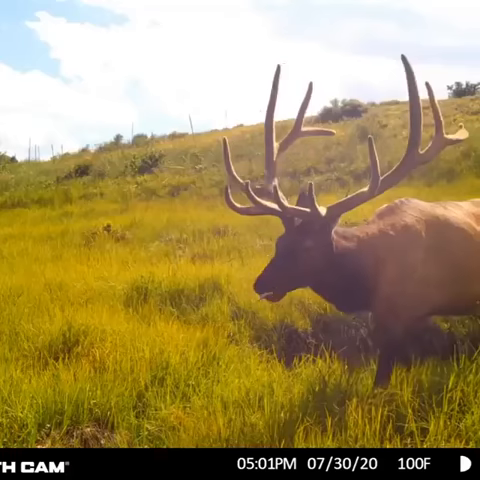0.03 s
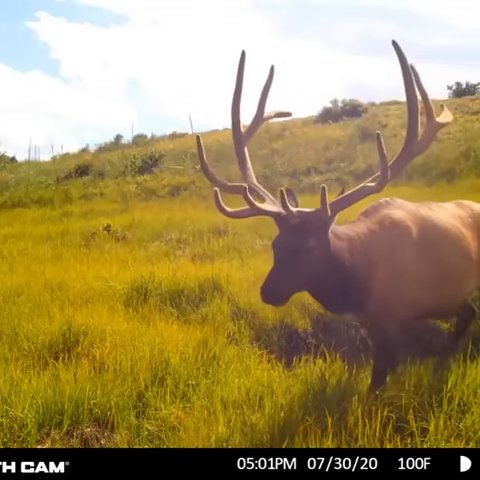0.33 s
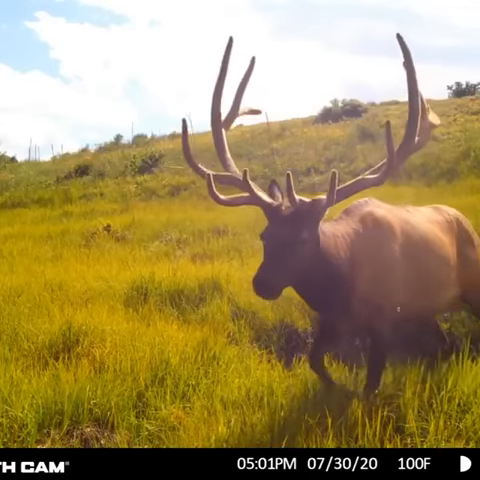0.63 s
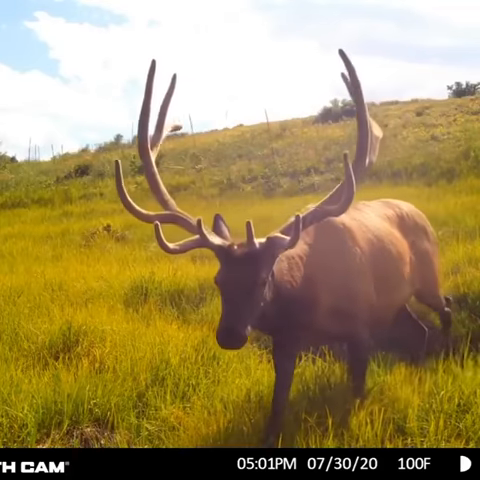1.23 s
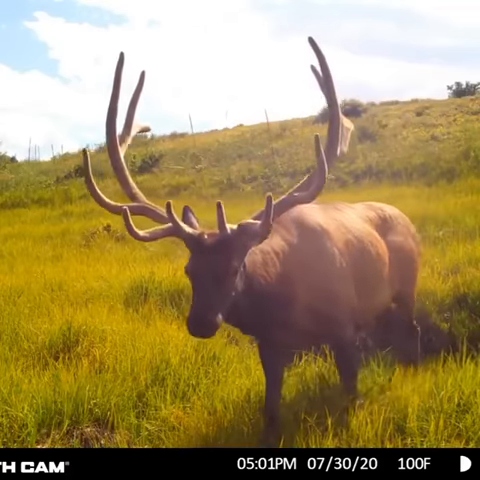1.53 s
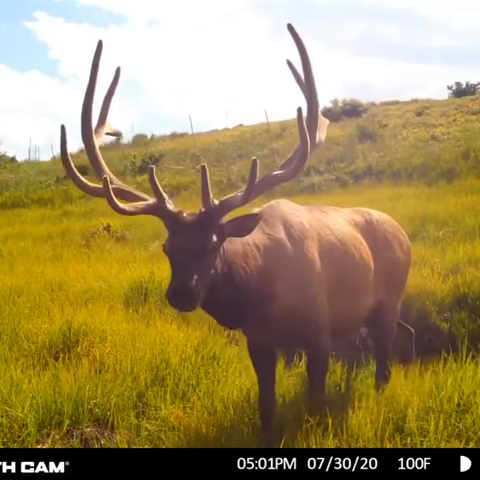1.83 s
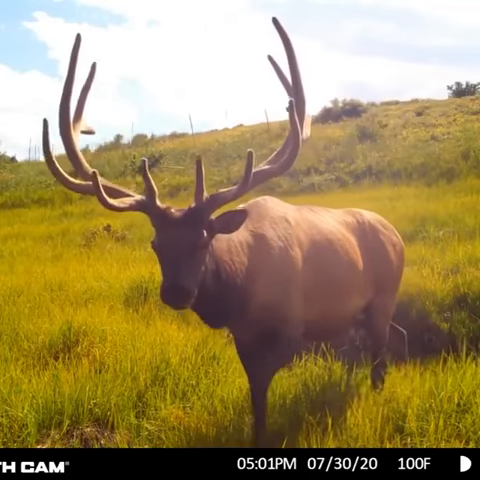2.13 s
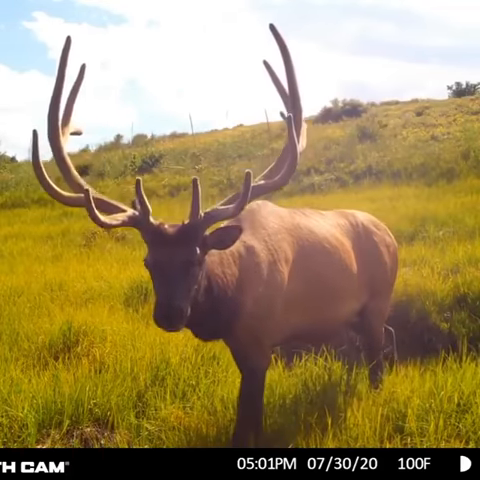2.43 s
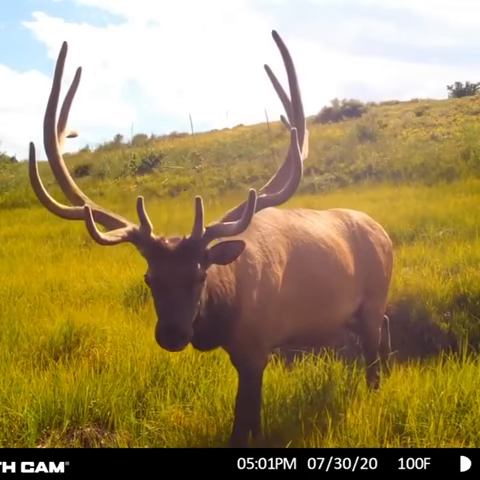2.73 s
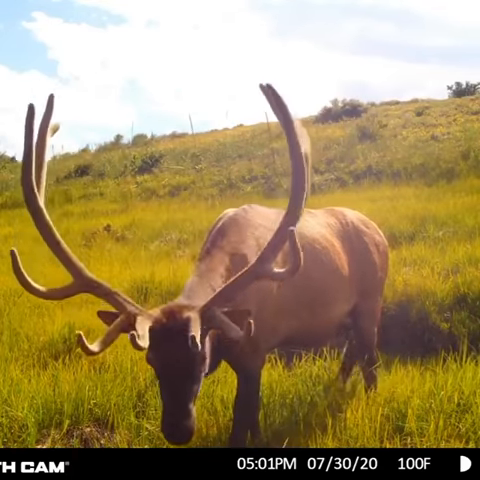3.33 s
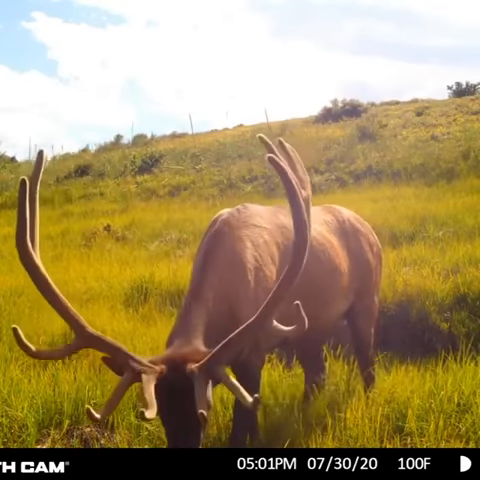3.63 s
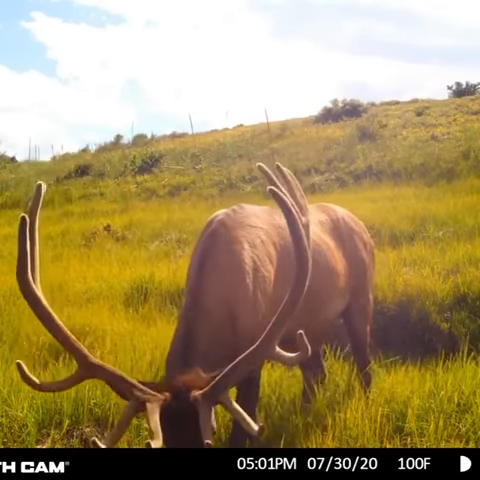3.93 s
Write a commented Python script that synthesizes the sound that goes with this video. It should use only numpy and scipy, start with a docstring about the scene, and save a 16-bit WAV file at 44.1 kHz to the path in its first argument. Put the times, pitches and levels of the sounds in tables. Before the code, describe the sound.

A bird whistles four short calls while grass swishes and wind buffets the microphone.

```python
"""A bird on a grassy hillside repeats a whistle that climbs in three steps and drops at the end.
Each note is one pure, sliding tone that echoes off the slope. An elk walks through the tall grass,
which swishes and ticks against its legs and crunches underfoot, all made of shaped noise.
Wind rumbles and thumps on the microphone over a faint hiss, and a second bird chirps far off."""
import sys
import numpy as np
from scipy import signal
from scipy.fft import rfft, irfft
from scipy.io import wavfile
from scipy.ndimage import uniform_filter1d

SR = 44100
rng = np.random.default_rng(int(sys.argv[2]) if len(sys.argv) > 2 else 0)


def wav_out(sig):
    """Save sig, one row per channel (or a flat mono array), as 16-bit PCM at SR to the path in sys.argv[1]."""
    wavfile.write(sys.argv[1], SR, np.round(np.clip(np.atleast_2d(sig).T, -1, 1) * 32767).astype(np.int16))


N = 176400
TIME = np.arange(N) / SR
START_S, CUTOFF_HZ = .083, 13200

# The bird's calls. Each row: starts in seconds of the three steps, the whistle and the drop,
# a pitch multiplier, then the base levels in dB of those five notes.
CALLS = [(.515, .549, .624, .668, .838, .998, -41.5, -35, -42, -37, -32),
         (1.245, 1.281, 1.323, 1.422, 1.583, .994, -43.5, -35, -42, -33, -35),
         (2.025, 2.059, 2.094, 2.18, 2.377, 1.004, -44, -38, -54, -37.5, -36),
         (2.827, 2.86, 2.886, 2.974, 3.189, 1.006, -44, -40, -43, -35.5, -33)]
# Note shapes. Each row: place in the note from 0 to 1, pitch in Hz, dB added to the base level.
STEP_1_SHAPE = [(0, 2140, 4), (.35, 2260, -13), (.7, 2397, -2.5), (1, 2220, -1)]
STEP_2_SHAPE = [(0, 2930, -13.5), (.3, 2880, -4), (.65, 2925, -8), (1, 3046, -2.5)]
STEP_3_SHAPE = [(0, 3934, -8), (1, 3992, -2)]
WHISTLE_SHAPE = [(0, 4020, -13.5), (.25, 4120, -8.5), (.45, 4190, -4.5), (.7, 4220, -3), (.88, 4212, -5),
                 (1, 4175, -8)]
DROP_SHAPE = [(0, 3193, -6.5), (.3, 2910, -6), (.65, 2936, -15), (1, 2686, -1)]
PIP_SHAPE = [(0, 2260, -12), (1, 2010, -35)]
# Moments when the song's level dips briefly, in seconds.
SONG_DIPS = [.666, 1.372, 1.414, 1.449, 2.252, 2.342, 3.011, 3.102, 3.16]
# Crunches underfoot. Each row: start in seconds, level in dB, pitch in Hz, fade time in seconds.
CRUNCHES = [(0.083, -51, 1160, 0.15), (.57, -49, 1270, 0.028), (1.847, -31.5, 950, 0.003),
            (1.897, -32, 1240, 0.0025), (2.801, -48, 1500, .008)]
# Legs brushing grass, and wind gusts. Each row: middle in seconds, half length in seconds, level in dB.
LEG_SWISHES = [(0.106, 0.028, -49), (0.277, 0.038, -49.5), (0.567, 0.089, -47.5), (0.831, 0.049, -35),
               (0.984, 0.086, -49.5), (1.237, 0.058, -50.5), (1.504, 0.041, -52), (1.642, 0.027, -43.5),
               (1.869, 0.11, -42), (2.281, 0.053, -42.5), (2.414, 0.032, -44.5), (2.843, 0.07, -56),
               (3.111, 0.081, -50.5), (3.306, 0.054, -46), (3.495, 0.058, -39.5), (3.647, 0.069, -45.5),
               (3.94, 0.05, -54)]
WIND_GUSTS = [(0.276, 0.11, -33.5), (1.391, 0.097, -35.5), (1.796, 0.055, -32.5), (2.454, 0.28, -34),
              (3.01, 0.1, -32)]
# Tone of the grass, wind, rough air in a thump, and hiss. Each row: frequency in Hz, strength in dB.
GRASS_TONE = [(300, -8), (3100, -7.5), (3800, -0.5), (4700, 4), (5840, -3), (6330, 0.5), (9330, 4),
              (13000, -4.5)]
RUMBLE_TONE = [(20, -5), (42, 5.5), (65, 2), (95, -6.5), (130, -10.5), (250, -41.5)]
BUFFET_TONE = [(80, -1.5), (185, 3), (280, -10.5), (450, -23), (1500, -68)]
HISS_TONE = [(100, 10), (700, 3.5), (3100, -6.5), (6000, -25), (9000, -30), (13000, -43)]
# Stereo width. Each row: frequency in Hz, gain in dB of the part that sets left and right apart.
STEREO_WIDTH = [(3000, -92), (4500, -6.5), (6500, -4), (12500, -3.5)]
# Wind thumps on the microphone. Each row: middle in seconds, level in dB, pitch in Hz.
WIND_THUMPS = [(0.156, -28.5, 75.2), (0.203, -32.5, 137.5), (0.234, -29.5, 117.1), (0.319, -25, 69.1),
               (0.487, -33, 72.4), (0.751, -21, 54.33), (1.419, -23, 48), (1.738, -27.5, 73.4),
               (2.109, -22.5, 62.4), (2.183, -25.5, 80), (2.23, -20, 78), (2.288, -25, 145.2),
               (2.331, -24, 85), (2.443, -22, 58.2), (2.531, -23, 90.8), (2.559, -24.5, 140.4),
               (2.656, -25.5, 81.4), (2.697, -24.5, 115), (2.766, -25.5, 70), (3.2, -29.5, 69.7)]
# Dry stalks ticking. Each row: start in seconds, level in dB.
STALK_TICKS = [(0.235, -41), (.567, -33), (.864, -29), (2.642, -40), (2.777, -45), (2.787, -40),
               (2.805, -37.5), (3.083, -36.5), (3.301, -34), (3.901, -41), (3.96, -42)]
# The far bird's chirps. Each row: start in seconds, length in seconds, starting pitch in Hz.
FAR_CHIRPS = [(0.402, 0.067, 5740), (1.016, 0.081, 5430), (1.206, 0.089, 5270), (2.702, .1, 5520),
              (3.146, 0.11, 5880)]


def from_db(db):
    """Turn decibels into a multiplier."""
    return 10 ** (np.asarray(db) / 20)


def unit_power(x):
    """Scale a sound so its average power is 1."""
    return x / np.sqrt(np.mean(x ** 2) + 1e-20)


def colour(x, tone):
    """Make each frequency louder or softer, following a table."""
    hz, db = np.transpose(tone)
    all_hz = np.arange(N // 2 + 1) * SR / N
    gain = from_db(np.interp(np.log(all_hz + 1), np.log(hz), db))
    return irfft(rfft(x) * gain, N)


def drift(rate_hz):
    """A smooth random wobble, about 1 in size."""
    r = np.exp(-2 * np.pi * rate_hz / SR)
    return unit_power(signal.lfilter([1], [1, -2 * r, r * r], rng.standard_normal(N + SR))[SR:])


def spread(middle, side):
    """Make stereo that is wide only in the treble."""
    return middle + colour(side, STEREO_WIDTH) * np.array([[1], [-1]])


def swell(middle_s, half_s, db):
    """The power of one smooth rise and fall."""
    return from_db(2 * db) / np.cosh(np.clip((TIME - middle_s) / half_s, -30, 30)) ** 2


def note(shape, start, end, db, pitch, fade_s=.009):
    """A pure tone that slides along its shape; pitch multiplies its frequency at every sample."""
    places, hz, shape_db = np.transpose(shape)
    on = (TIME >= start) & (TIME < end)
    t, out = TIME[on], np.zeros(N)
    place = (t - start) / (end - start)
    fade = np.sin(np.pi / 2 * np.clip(np.minimum(t - start, end - t) / fade_s, 0, 1))
    level = from_db(db + np.interp(place, places, shape_db))
    cycles = np.cumsum(np.interp(place, places, hz) * pitch[on]) / SR
    out[on] = np.sqrt(2) * fade * level * np.sin(2 * np.pi * cycles)
    return out


def bird(overlap_s=.0082, gap_s=.006, drop_s=.026, pip_s=.018):
    """Three short steps up, a long arched whistle, a tiny gap, then a quick drop and a last pip."""
    waver = 1 + .0016 * drift(33)
    # An earlier call is just ending as the sound begins.
    out = note(DROP_SHAPE, .089, .089 + drop_s, db=-34.5, pitch=waver)
    out += note([(0, 4016, .0083), (1, 4060, .0043)], START_S, .089 + drop_s + pip_s, -51, waver)
    for first, second, third, whistle, drop, tuning, *levels in CALLS:
        first_db, second_db, third_db, whistle_db, drop_db = levels
        pitch = tuning * waver
        out += note(STEP_1_SHAPE, first, second + overlap_s, first_db, pitch)
        out += note(STEP_2_SHAPE, second, third, second_db, pitch)
        out += note(STEP_3_SHAPE, third, whistle - gap_s, third_db, pitch)
        out += note(WHISTLE_SHAPE, whistle, drop - gap_s, whistle_db, pitch)
        out += note(DROP_SHAPE, drop, drop + drop_s, drop_db, pitch)
        out += note(PIP_SHAPE, drop + drop_s, drop + drop_s + pip_s, drop_db, pitch)
    return hillside(out, echo_db=-13.5) * flutter()


def hillside(x, echo_db, echo_s=.42, bounce_s=.0227, bounce_db=-13.5):
    """Add one nearby bounce and the scattered echo of the slope."""
    t = TIME[:SR]
    tail = rng.standard_normal(SR) * from_db(-60 * t / echo_s) * (t > .012)
    echo = signal.fftconvolve(x, unit_power(tail) / np.sqrt(SR))[:N]
    bounce = np.interp(TIME - bounce_s, TIME, x)
    return x + from_db(bounce_db) * bounce + from_db(echo_db) * echo


def flutter(tremble_db=1.8, dip_depth=.92, dip_half_s=.007):
    """The song's level trembles, and now and then it dips for a moment."""
    dips = sum(np.exp(-((TIME - s) / dip_half_s) ** 2) for s in SONG_DIPS)
    return (1 - dip_depth * dips) * from_db(tremble_db * drift(70))


def crunches(band_ratio=1.34):
    """Each stalk the elk steps on gives a fading burst of noise around its own pitch."""
    out = np.zeros((2, N))
    for start, db, hz, fade_s in CRUNCHES:
        age = np.maximum(TIME - start, 0)
        band = signal.butter(2, [hz / band_ratio, hz * band_ratio], "band", fs=SR, output="sos")
        noise = unit_power(signal.sosfilt(band, rng.standard_normal((2, N))))
        out += from_db(db) * noise * (age > 0) * np.exp(-np.minimum(age / fade_s, 40))
    return spread(*out)


def grass(rest_db=-66.5, flicker_db=1.5, base_clicks_per_s=2500, click_share=.18):
    """Blades slide and flick against the legs: a hiss full of tiny clicks, denser in each stride."""
    power = from_db(2 * rest_db) + sum(swell(*row) for row in LEG_SWISHES)
    swish_db = 10 * np.log10(power) + flicker_db * drift(22.4)
    clicks_per_s = base_clicks_per_s * from_db((swish_db - swish_db.mean()) / 2)
    hits = rng.random((2, N)) < clicks_per_s / SR
    sizes = from_db(-.5 * np.minimum(rng.exponential(1, (2, N)), 5))
    clicks = unit_power(hits * sizes * rng.choice([-1, 1], (2, N)))
    rub = np.sqrt(click_share) * clicks + np.sqrt(1 - click_share) * rng.standard_normal((2, N))
    loudness = np.hypot(from_db(swish_db), ticks(swish_db))
    return spread(*(unit_power(colour(rub, GRASS_TONE)) * loudness))


def swirling_air(tone, db):
    """The low noise of swirling air, with its slow swings in level evened out."""
    swirls = colour(rng.standard_normal(N), tone)
    return swirls / np.sqrt(uniform_filter1d(swirls ** 2, size=9000)) * from_db(db)


def wind(breeze_top_hz=61):
    """A steady breeze gives only the deepest rumble; each gust adds more."""
    keep_lows = signal.butter(2, breeze_top_hz, fs=SR, output="sos")
    breeze = signal.sosfilt(keep_lows, swirling_air(RUMBLE_TONE, db=-42))
    gust_power = sum(swell(*row) for row in WIND_GUSTS)
    return breeze + swirling_air(RUMBLE_TONE, db=0) * np.sqrt(gust_power)


def hiss():
    """A faint, steady background noise."""
    return from_db(-57.5) * spread(*unit_power(colour(rng.standard_normal((2, N)), HISS_TONE)))


def thumps(half_s=.016):
    """Each swirl that hits the microphone gives a short, round thump; higher ones are rougher."""
    out, buffet = np.zeros(N), swirling_air(BUFFET_TONE, db=-9.5)
    for middle_s, db, hz in WIND_THUMPS:
        push = np.sin(2 * np.pi * (hz * TIME + rng.random()))
        roughness = buffet * (hz / 100) ** 1.83
        out += from_db(db) * np.exp(-((TIME - middle_s) / half_s) ** 2) * (push + roughness)
    return out


def ticks(swish_db, crackles_per_s=60, fade_s=.002):
    """The loudness of stalks flicking back: clear ticks, plus random crackle that follows the stride."""
    crackle_db = 8.5 + (swish_db + swish_db.mean()) / 2
    flicks = (rng.random(N) < crackles_per_s / SR) * rng.random(N) * from_db(crackle_db)
    for start, db in STALK_TICKS:
        flicks[int(start * SR)] += from_db(db)
    return signal.lfilter([1], [1, -np.exp(-1 / (fade_s * SR))], flicks + 1e-18)


def far_bird(fall_hz_per_s=12000):
    """Thin chirps that slide down; a fast wobble in pitch makes them raspy."""
    rasp = 1 + .032 * drift(182)
    out = np.zeros(N)
    for start, length, hz in FAR_CHIRPS:
        slide = [(0, hz, 0), (1, hz - fall_hz_per_s * length, 0)]
        out += note(slide, start, start + length, db=-58.5, pitch=rasp)
    return hillside(out, echo_db=-7)


def scene():
    """Birds, grass and wind over the steady hiss."""
    return hiss() + bird() + far_bird() + grass() + crunches() + wind() + thumps()


def record(dry):
    """The microphone switches on after a moment and cuts off the highest treble."""
    treble_cut = signal.firwin(401, CUTOFF_HZ, fs=SR)
    return signal.fftconvolve(dry * (TIME > START_S), treble_cut[None], mode="same", axes=1)


dry = scene()
out = record(dry)
wav_out(out)
```